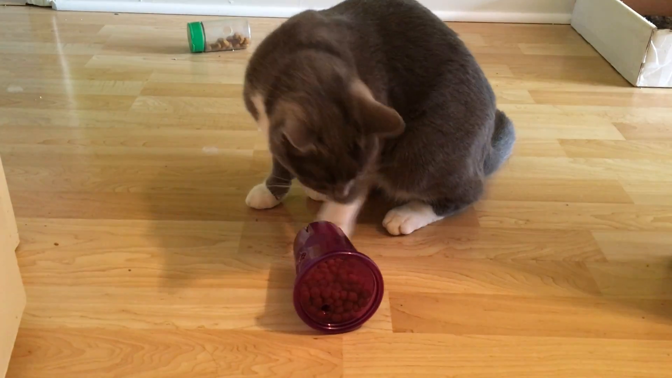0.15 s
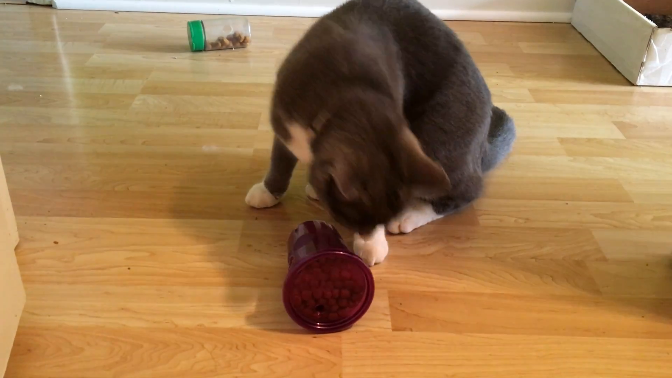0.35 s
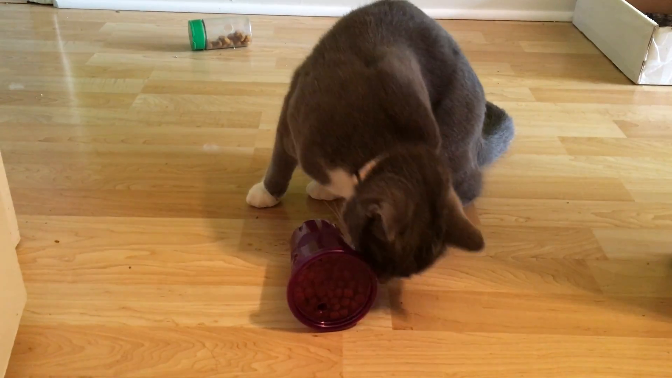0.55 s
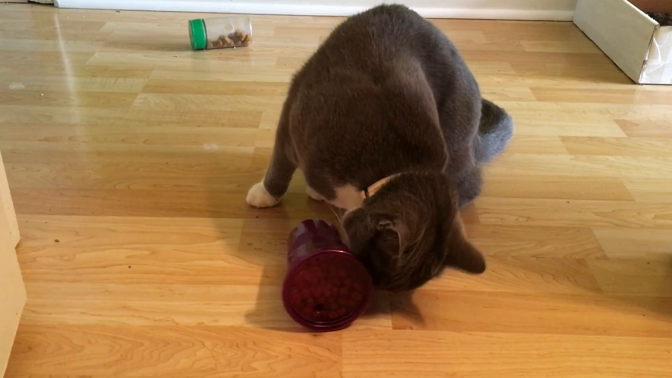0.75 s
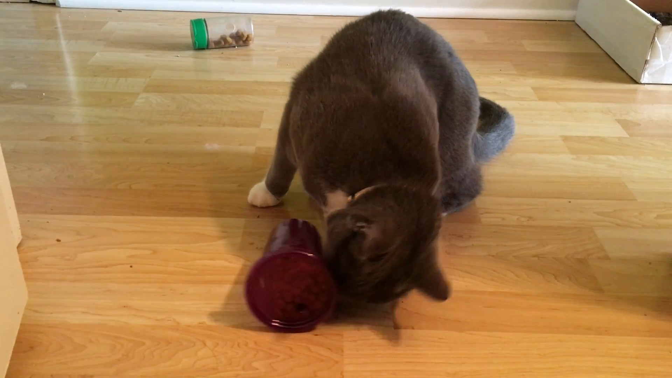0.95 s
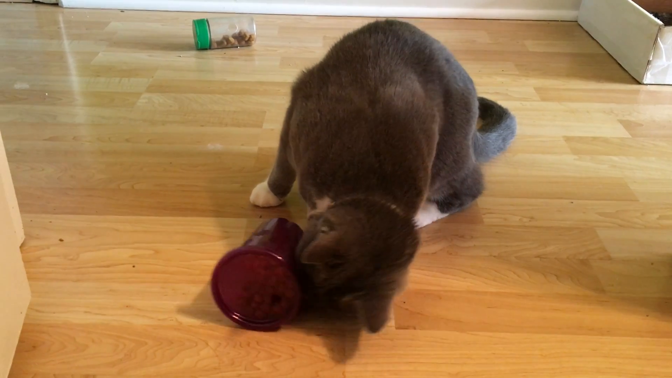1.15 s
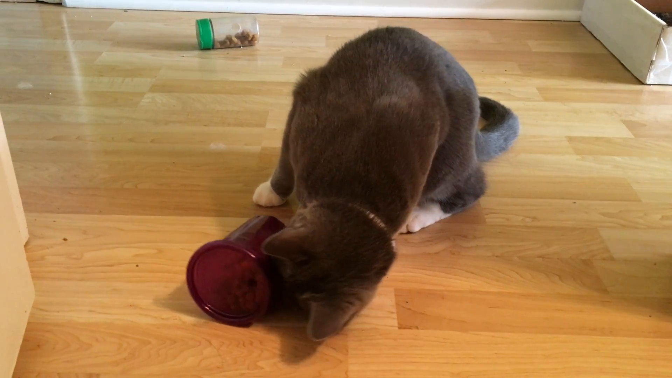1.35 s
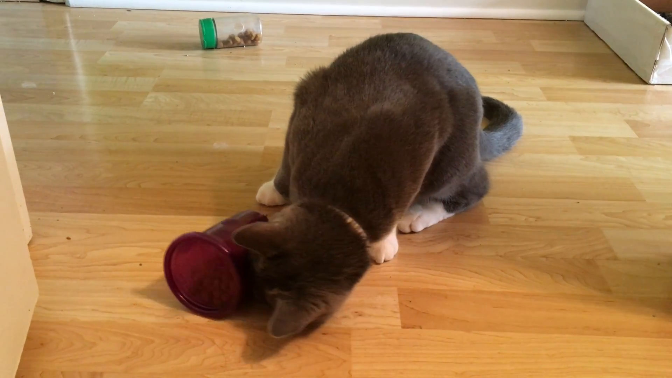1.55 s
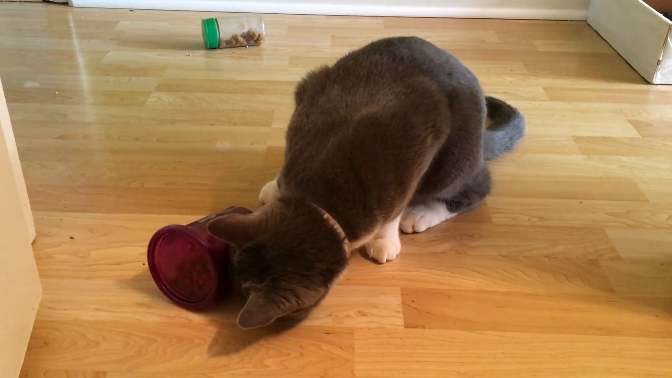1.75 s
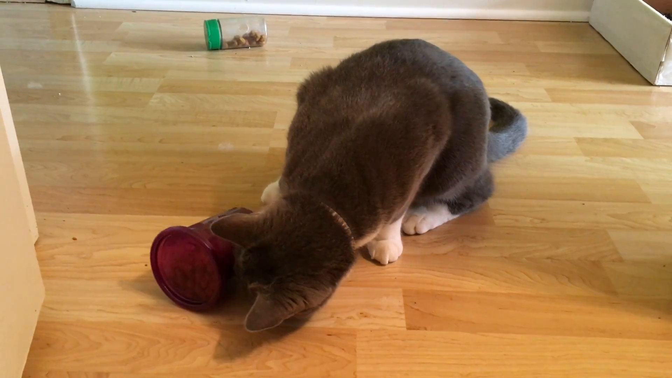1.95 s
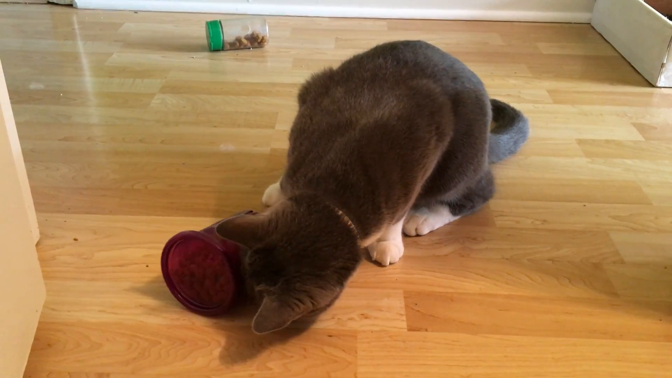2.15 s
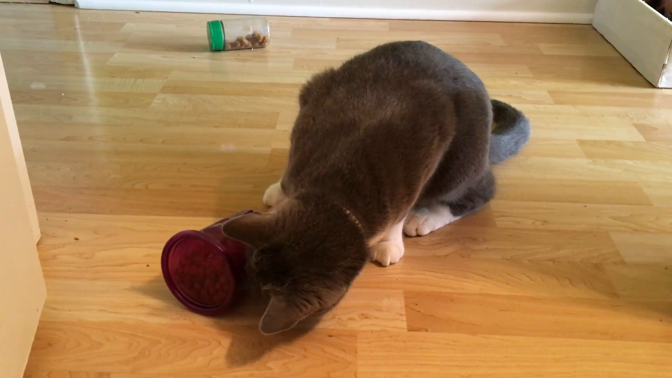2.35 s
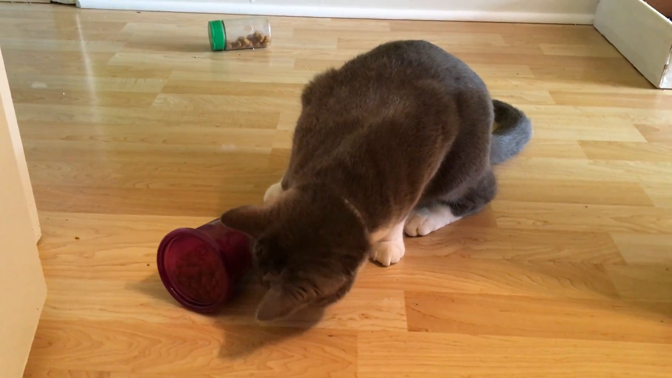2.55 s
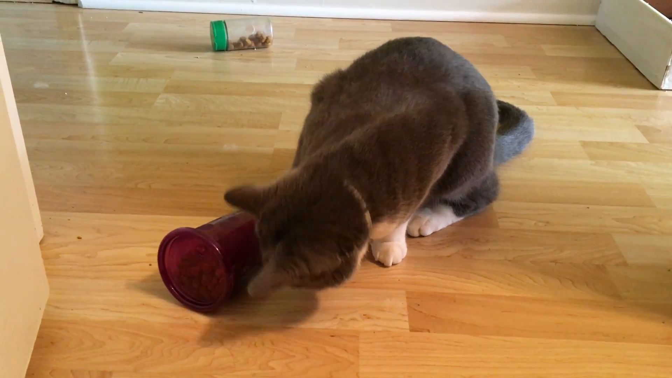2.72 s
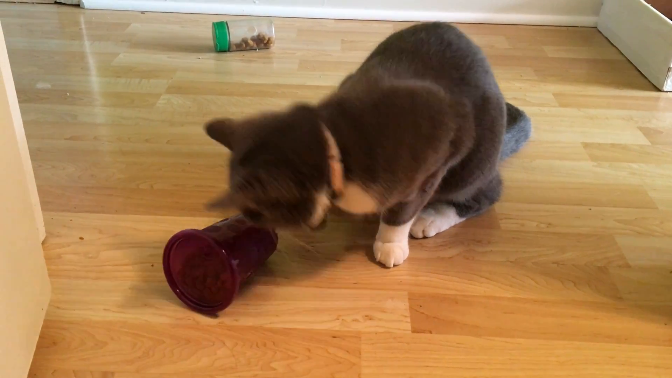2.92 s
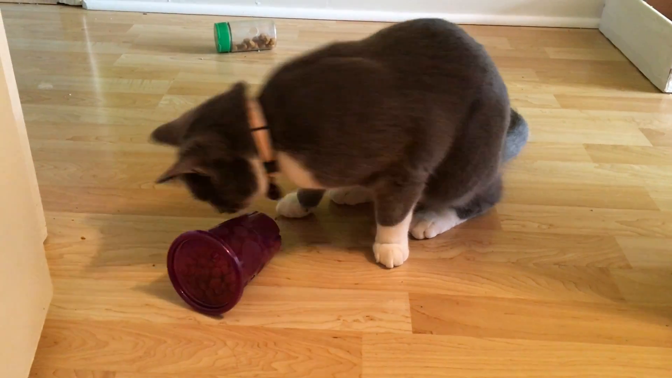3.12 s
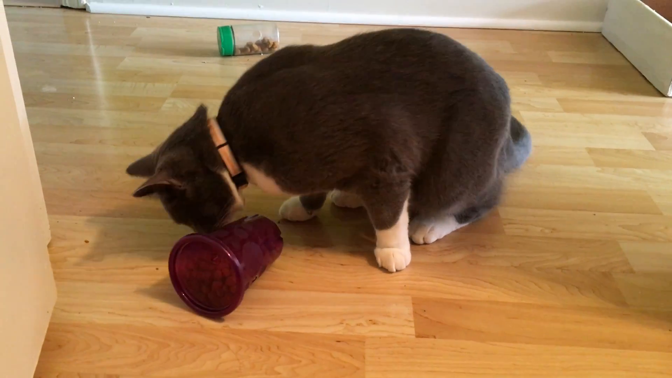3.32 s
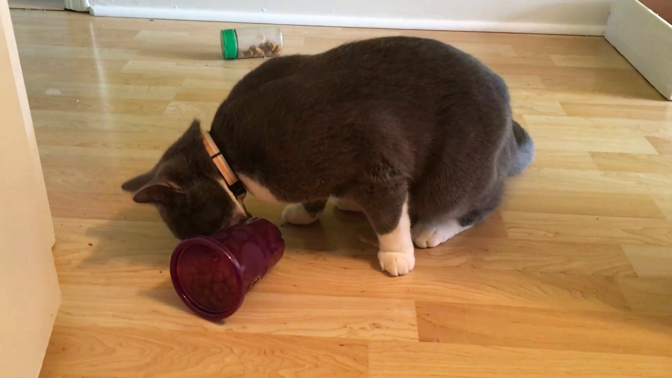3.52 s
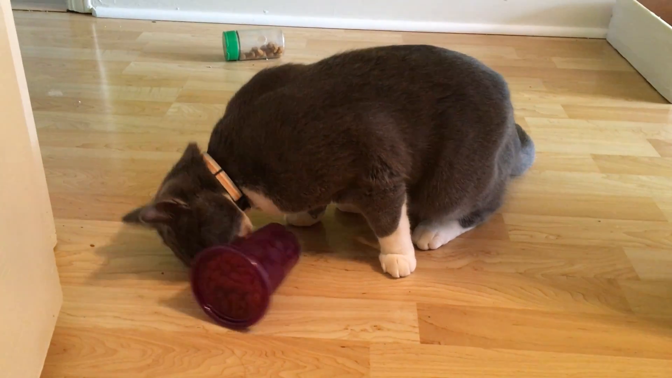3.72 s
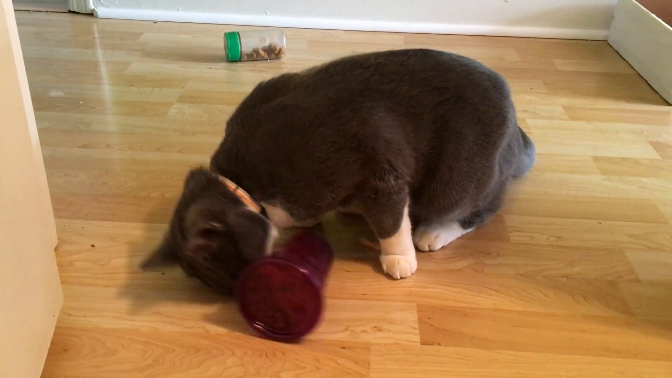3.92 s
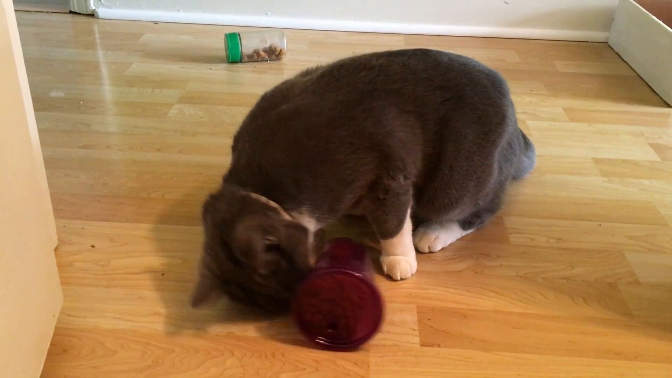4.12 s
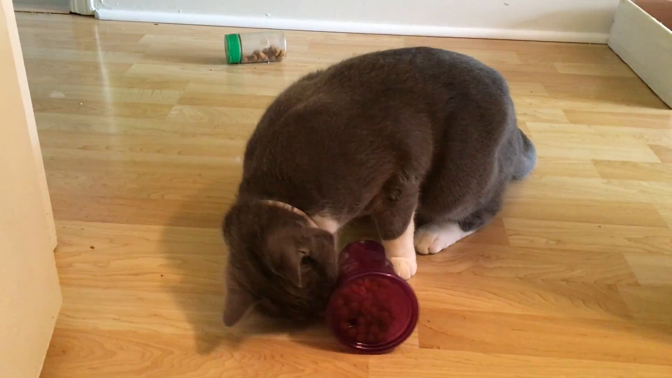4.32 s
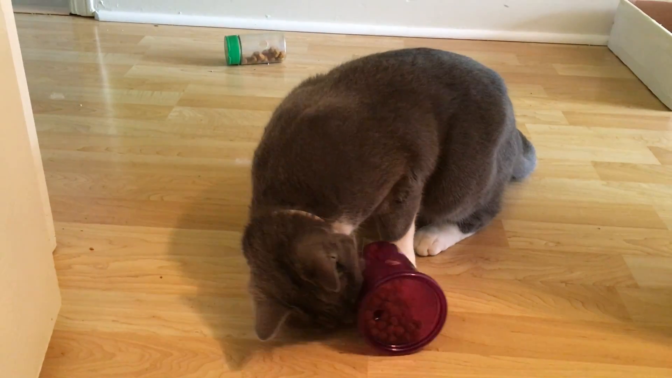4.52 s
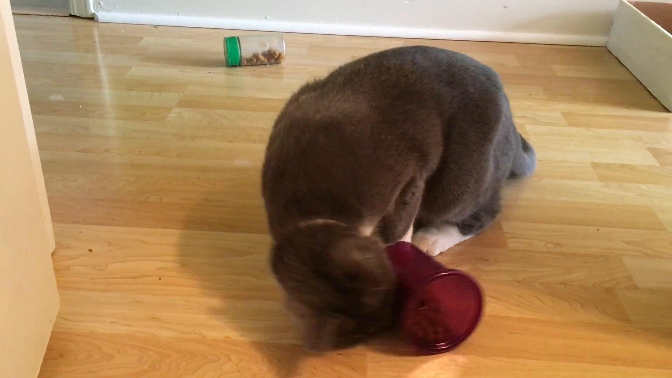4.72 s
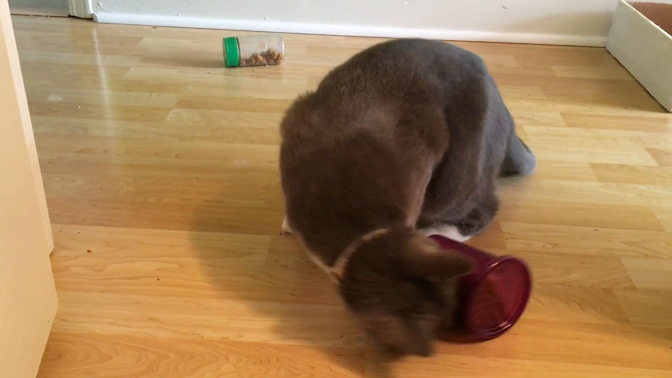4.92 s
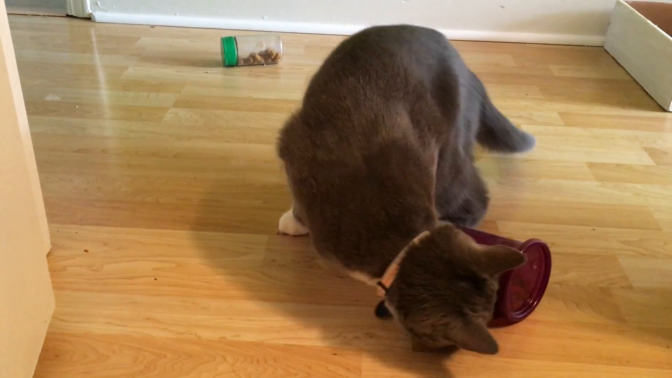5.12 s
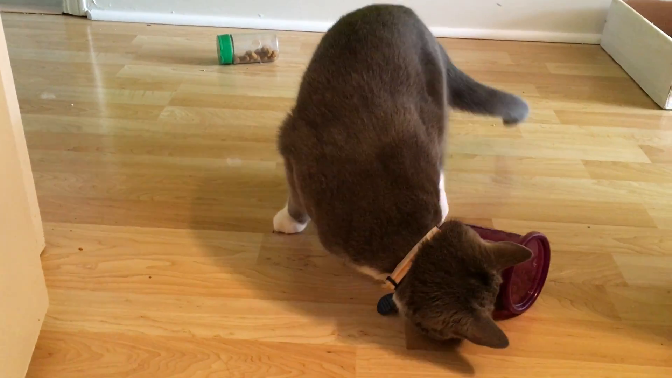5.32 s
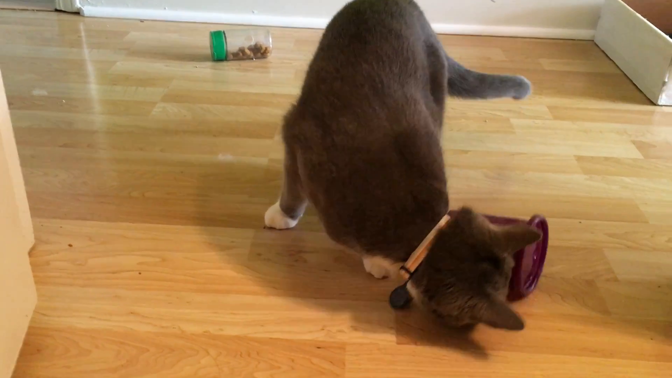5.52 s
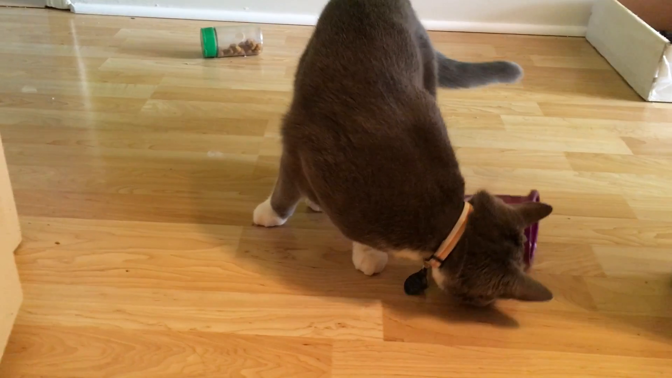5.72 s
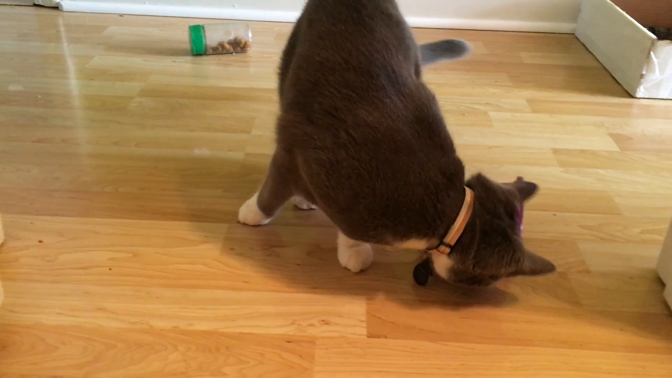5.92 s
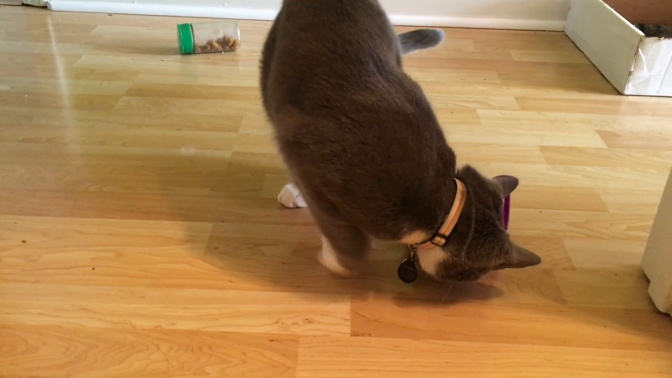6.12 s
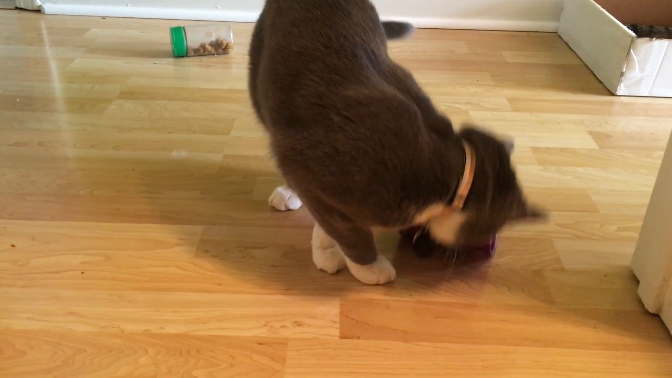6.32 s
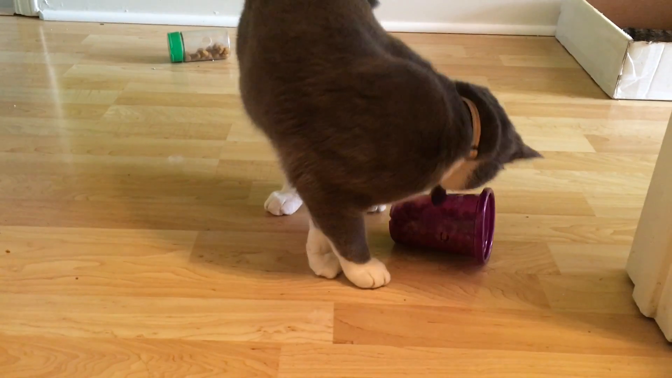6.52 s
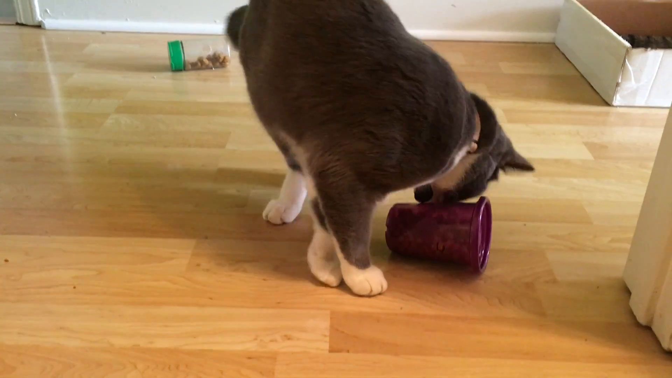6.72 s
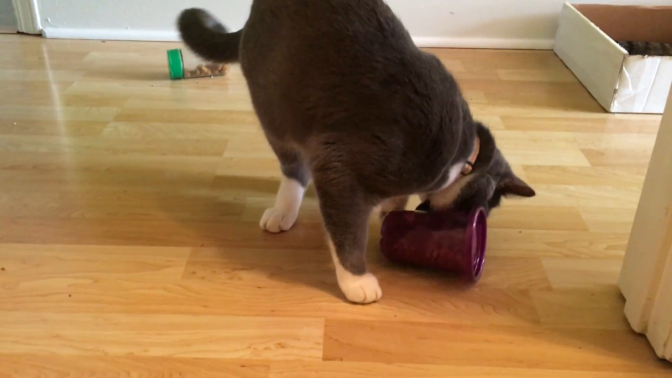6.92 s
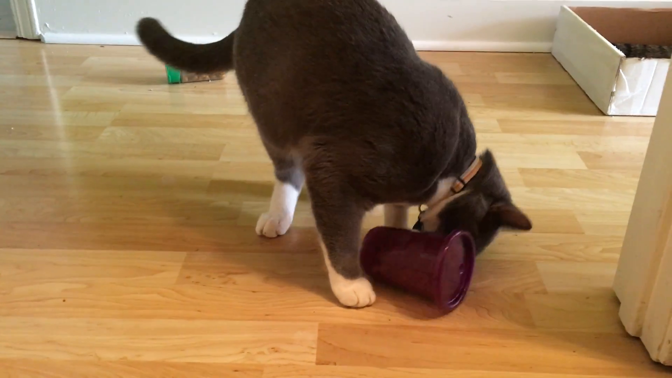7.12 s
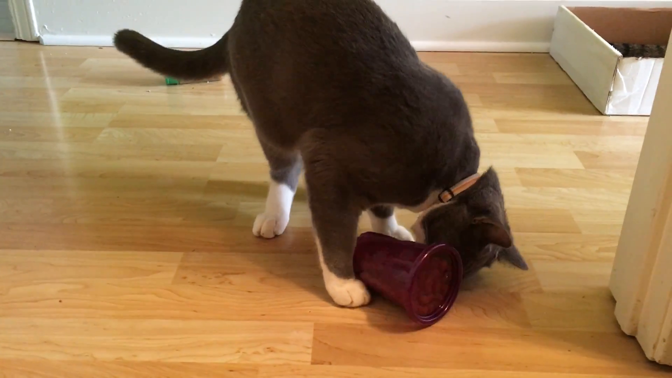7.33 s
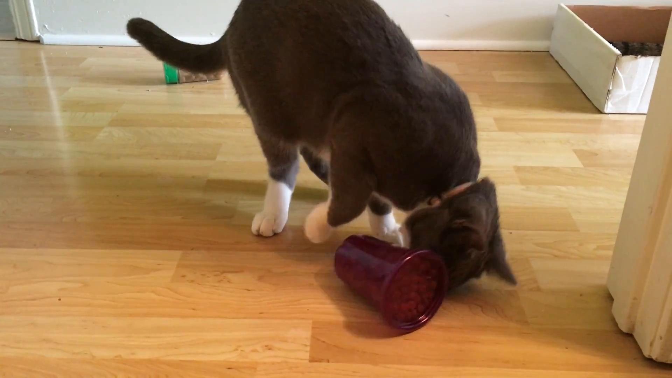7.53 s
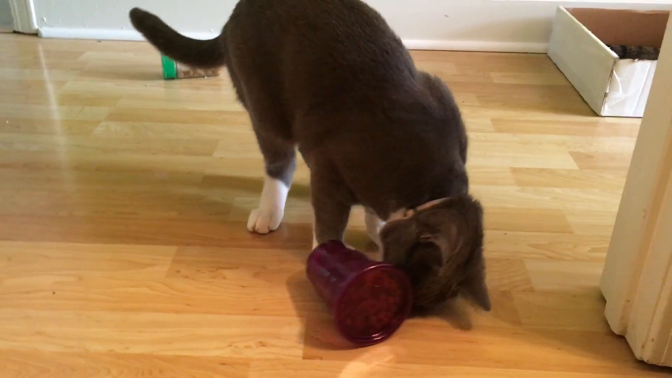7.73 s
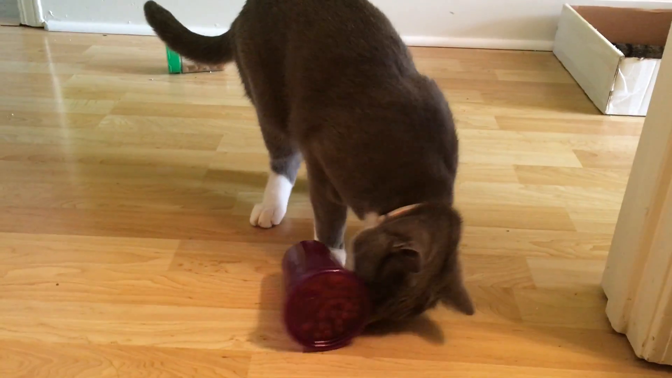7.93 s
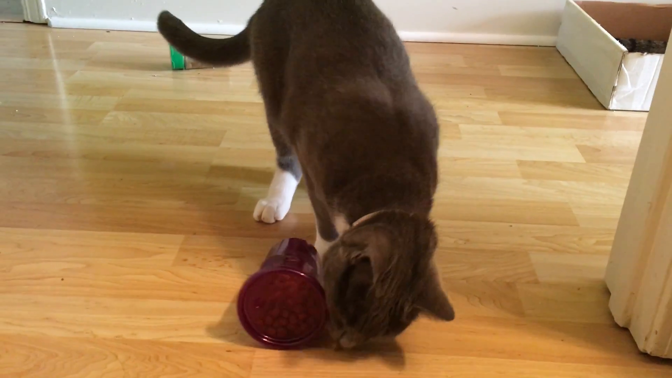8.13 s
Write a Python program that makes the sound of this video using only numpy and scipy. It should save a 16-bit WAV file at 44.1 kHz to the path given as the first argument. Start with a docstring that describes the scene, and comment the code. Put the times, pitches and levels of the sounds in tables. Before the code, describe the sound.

Dry food clicks and tumbles in a plastic cup as a cat nudges it over floorboards, its collar tag tinkling briefly.

```python
"""A small hard room with a wood floor, one microphone close to a cat and a plastic cup of dry food.
At first only faint nosing, over a humming refrigerator and the hiss of the microphone. After a second
the cat shoves the cup: food tumbles and clicks inside, the rim bumps the boards. A lull, then from
4 s a longer push, ending at 6 s with a clear tinkle of the metal collar tag. A paw is set down,
and from 7 s two more bursts of shoving set the food rattling again."""
import sys
import numpy as np
from scipy import signal
from scipy.fft import rfft, irfft
from scipy.io import wavfile

SR = 44100
rng = np.random.default_rng(int(sys.argv[2]) if len(sys.argv) > 2 else 0)


def to_wav(sig):
    """Store sig (one row per channel, or 1-D mono) as 16-bit WAV at the path in sys.argv[1].

    Samples outside -1..1 are clipped; the rate is SR.
    """
    pcm = np.clip(np.atleast_2d(sig), -1, 1) * 32767
    pcm = np.round(pcm).astype(np.int16)
    wavfile.write(sys.argv[1], SR, pcm.T)  # frames by channels


N = 359856

# single pieces of food striking the cup wall:
# (time [s], level [dB], ring centre [Hz], tick against level [dB], ring spread [octaves])
FOOD_HITS = [(1.1152,-22.5,3168,-27,0.38),(1.1268,-31,3060,-34,0.77),(1.144,-27,2940,-37.5,0.37),(1.16,-36,2980,-32,0.56),(1.175,-30.5,2500,-35.5,0.36),(1.1937,-11.5,2690,-28,0.66),(1.2162,-18.5,3780,-28.5,0.87),(1.218,-17.5,4000,-26,0.71),(1.2414,-15,2480,-20,0.93),(1.2642,-24,2690,-21,0.69),(1.313,-17,2792,-27,0.72),(1.3248,-19,3140,-22,0.62),(1.3988,-32,1196,-29.5,1.6),(1.4355,-19,1500,-26,1.15),(1.455,-22,3290,-29,0.44),(1.464,-25,1220,-20,1),(1.479,-30.5,1700,-14,1.4),(1.5117,-31.5,1008,-26,0.57),(1.534,-22,1730,-20,1.2),(1.541,-22.5,1570,-28,1.4),(1.5623,-21.5,1290,-34,0.27),(1.606,-20,2340,-29,0.69),(1.632,-16.5,2400,-24,1.5),(1.6383,-28,1700,-18,0.64),(1.6707,-29,3420,-38,0.6),(1.6776,-32,1700,-29,0.91),(1.6884,-23,3260,-35,0.57),(1.7255,-17.5,2140,-35,1.9),(1.7754,-28,1294,-39,0.77),(1.781,-29,1600,-36.5,1),(1.7968,-17.5,1600,-37.5,0.82),(1.8348,-19.5,1370,-33,1.1),(1.8472,-25,2160,-31,1),(1.857,-24,3220,-35,0.89),(1.8934,-23.5,902,-35.5,0.6),(1.8997,-23,2000,-36,0.95),(1.921,-44.5,1530,-34,0.59),(1.9645,-24.5,1743,-20,1.35),
             (3.863,-27.5,3700,-31,0.47),(3.8815,-26.5,1704,-31,0.9),(3.917,-25,1398,-41.5,0.45),(3.933,-19.5,3350,-24,0.75),(3.9478,-25,3080,-33,1.1),(3.9847,-31,3300,-32,0.72),(4.0068,-20.5,2860,-38,0.77),(4.02,-18.5,3100,-37,0.47),(4.0395,-26.5,3493,-31.5,0.63),(4.044,-16,3497,-35,1),(4.052,-17,4800,-20,0.7),(4.069,-14,3640,-21,0.64),(4.0833,-18,3300,-25.5,0.55),(4.0985,-15,2150,-23,1),(4.107,-18,2310,-27,1),(4.1338,-17,3290,-23.5,0.72),(4.143,-13,3250,-31.5,0.68),(4.1716,-21,3900,-22,.6),(4.1822,-13.5,3352,-22,0.56),(4.1865,-15,3300,-28,0.79),(4.1929,-14,2330,-23,1.1),(4.2158,-16,3290,-27,0.86),(4.2243,-21,2680,-17,1.1),(4.241,-25.5,3401,-19,.6),(4.2805,-17,3400,-20,0.83),(4.3062,-22,4106,-30,.6),(4.3263,-20.5,3260,-28,0.49),(4.3589,-24.5,2300,-26,0.49),(4.38,-27,3330,-33,0.43),(4.43,-25,3440,-28,0.66),(4.4723,-24,3245,-27,0.42),(4.4826,-24.5,2420,-37,0.41),(4.495,-32,2020,-26,0.69),(4.5061,-23.5,2370,-23,1.1),
             (4.6315,-18,3640,-24.5,1.01),(4.672,-21,4070,-29,0.44),(4.7005,-20.5,3620,-25,0.92),(4.705,-18,2750,-28,0.87),(4.7112,-22.5,3000,-31.5,0.76),(4.7138,-18,3116,-27,0.86),(4.7423,-18,2422,-25,1.1),(4.797,-34,2202,-32.5,0.86),(4.8025,-27,2060,-33,0.65),(4.8276,-33,2570,-26,0.53),(4.849,-22,3262,-35.5,0.84),(4.865,-23,2030,-34,0.25),(4.8964,-23,3259,-29,0.63),(4.9096,-15.5,2620,-22,0.77),(4.929,-14.5,2300,-31,1.1),(4.9496,-21,1966,-25,1.08),(4.957,-23,2071,-28,.6),(4.9622,-19,1970,-29.5,0.97),(4.969,-14.5,2000,-23,1),(5.0032,-15,2280,-24,1.1),(5.0335,-19.5,2004,-21,0.97),(5.0489,-19,1950,-36,0.37),(5.0726,-21,1821,-19,0.55),(5.0805,-17.5,3900,-28.5,0.88),(5.116,-19.5,1593,-21,1.1),(5.1248,-16.5,1711,-21.5,1.1),(5.145,-20,1440,-20,0.5),(5.1758,-20,3400,-11.5,0.67),(5.228,-22.5,2214,-23,0.65),(5.276,-25,1510,-36,0.45),(5.3016,-27.5,1680,-33,0.88),(5.34,-28,2273,-26,1.6),(5.357,-30.5,1640,-35,0.97),(5.3708,-25.5,1450,-33,0.41),(5.399,-28,1420,-31,0.3534),(5.4341,-29.5,3550,-18.5,0.38),(5.474,-39,1820,-32.5,0.28),
             (5.548,-32.5,2173,-25,0.87),(5.5593,-31,2170,-36,.6),(5.6,-37,3125,-17,0.73),(5.6547,-37,1301,-34,0.75),(5.6854,-28,1551,-34,0.26),(5.705,-28,2240,-31,.6),(5.716,-23.5,2090,-34,0.51),(5.7214,-20,1930,-24,0.88),(5.749,-25,1900,-28,0.81),(5.7576,-25,2299,-31,0.54),(5.767,-12,1900,-31,1.1),(5.7815,-20,2400,-28,0.82),(5.795,-17,2000,-26,0.91),(5.807,-21,2200,-30,0.74),(5.819,-23,1920,-30,0.56),(5.8402,-30.5,1897,-33.5,0.46),(5.861,-19.5,1900,-30,0.6),(5.895,-29,1628,-26.5,0.66),(5.9384,-24.5,1619,-37,0.73),(5.9524,-22,1798,-36,.6),(5.988,-26,1600,-38,0.8),(6.0046,-34,1700,-35.5,0.37),(6.0352,-42.5,1170,-35.5,0.53),(6.0709,-31.5,3600,-9,.9),(6.1455,-27,1905,-23,0.81),(6.15,-31.5,2565,-21,0.86),
             (6.7175,-32.5,1110,-27.5,0.45),(6.7332,-34.5,5010,-13,0.61),(6.7343,-40,1390,-30,0.34),(6.7944,-30.5,2600,-20,1.06),(6.895,-47,1348,-40,0.29),(6.91,-46,1923,-3,1.23),(6.9272,-28,1570,-32,0.21),(6.953,-42.5,1680,-25,0.3),
             (7.14,-37.5,1600,-30,1.1),(7.1515,-31.5,3500,-31,0.46),(7.1612,-29,2248,-29,0.66),(7.2042,-38,2047,-17,0.92),(7.2245,-25,2090,-30,0.79),(7.2366,-22,1430,-23,1.34),(7.2564,-17.5,2440,-35,0.95),(7.2703,-19,1420,-25,1.137),(7.2795,-24,2020,-32,0.67),(7.306,-11,1410,-23,1.86),(7.3105,-13.5,1900,-22,1.2),(7.3448,-23,2003,-30,0.55),(7.3578,-20,2460,-25,0.93),(7.3691,-11.5,1670,-25,1.5),(7.3733,-24,2000,-29,1),(7.3902,-29,1798,-26,0.71),(7.408,-22.5,1138,-25,1.2),(7.4475,-38.5,1206,-31.5,0.743),(7.4945,-32,1708,-39.5,0.32),
             (7.6933,-34,2500,-30,0.53),(7.7053,-18,2370,-29,1.39),(7.732,-35,2659,-27.5,0.75),(7.765,-18,2660,-41.5,0.68),(7.7985,-28,2590,-33,.8),(7.8116,-16,2389,-39,1.2),(7.8241,-11.5,2280,-32,1.37),(7.834,-17,3000,-31,.9),(7.8514,-13.5,3400,-23,0.72),(7.889,-18,2478,-25,1.3),(7.9156,-23.5,1723,-27,1),(7.972,-16,2528,-28,0.9),(7.9771,-21,2812,-32,0.88),(7.986,-21,2394,-31,0.84),(8.004,-21,1721,-29.5,1.6),(8.0076,-16.5,3000,-25,1.2),(8.0167,-29,3000,-30,.7),(8.0282,-22,3014,-28,0.66),(8.0435,-22,1770,-35.5,1.1),(8.0603,-17.5,3280,-27,.8),(8.0662,-15,3060,-33,0.87),(8.0823,-17.5,3311,-26,1.09),(8.091,-17.5,3352,-14.5,1.7),(8.1008,-13.5,2720,-23,1.2),(8.108,-20,2400,-28.5,0.94),(8.1338,-22,3674,-19,0.51)]
# shoves of the nose: (top reached [s], swell [s], hold [s], decay [s], force [dB],
# boards against force [dB], rattle centre [Hz], brightness [dB/octave])
SHOVES = [(0.05, 0.076, 0.083, 0.17, -72, 0.5, 2530, -1.5), (1.12, 0.094, .05, .05, -59.5, 15, 2690, -5),
          (1.188, 0.11, 0.15, 0.16, -42.5, -15, 2530, -2), (1.439, 0.042, 0.11, 0.11, -42, -8.5, 1870, -2),
          (1.66, 0.27, 0.046, 0.31, -43.5, -12, 2430, -1),
          (1.809, 0.18, 0.0091, 0.35, -41.5, -3.5, 1980, 0.5), (3.919, 0.11, 0.119, .1, -49, 2.5, 2350, -4),
          (4.07, 0.19, 0.18, 0.44, -38.5, -2.5, 2720, -1.5),
          (4.708, 0.21, 0.042, 0.26, -45.5, -0.5, 2600, -4), (5.0, 0.67, 0.19, 0.24, -40, -3, 1990, -0.5),
          (5.36, 0.0991, 0.024, 0.68, -57, -6.5, 1800, -1), (5.69, 0.21, 0.031, 0.11, -48.5, 2.5, 1710, -3),
          (5.765, 0.075, 0.013, 0.4, -35.5, -10, 1810, 0.5),
          (5.928, 0.11, 0.011, 0.41, -48.5, 1.5, 1668, -1.5), (6.75, 0.284, .05, .4, -66.5, -22, 2210, 2),
          (7.17, 0.0602, 0.13, 0.0984, -54.5, 5, 1930, -4),
          (7.314, 0.048, 0.024, 0.34, -40, -3.5, 1840, -0.5),
          (7.73, 0.056, 0.08, 0.05286, -54, 5, 2002, -2.5),
          (7.814, 0.047, 0.034, 0.25, -34, -8, 2420, -1.5), (8.001, 0.035, 0.024, 0.168, -41, -8, 2423, -2),
          (8.1, 0.2, 0.0157, 0.38, -36.5, -5, 2823, -3.5)]
# rim knocking the boards: (time [s], level [dB], ring centre [Hz])
RIM_KNOCKS = [(1.188, -23, 390), (1.224, -30, 482), (1.261, -28.5, 624), (1.29, -32, 525.9),
              (1.398, -28, 507), (1.514, -28, 533), (1.563, -28.5, 358), (1.6, -26, 530),
              (1.619, -33.5, 450), (1.744, -32, 422), (1.842, -29.5, 530), (1.893, -24, 496),
              (3.915, -36, 479), (3.995, -37, 516.5), (4.013, -25.5, 340), (4.169, -36, 450),
              (4.218, -30, 487.8), (4.229, -28, 418), (4.251, -25, 405), (4.308, -26, 540),
              (4.358, -29, 505), (4.378, -29, 373), (4.423, -27.5, 400.6), (4.4326, -24.5, 617),
              (4.484, -33, 546), (4.516, -34, 426), (4.688, -37.5, 380.1), (4.83, -33, 544),
              (4.89, -34, 365), (4.923, -32, 560), (4.967, -31, 363), (4.981, -32, 450), (5.014, -25, 358),
              (5.053, -49, 460), (5.076, -38, 435), (5.121, -29, 415), (5.225, -39, 559.6),
              (5.27, -32, 384), (5.309, -31.5, 390), (5.3731, -28, 394), (5.751, -36, 396),
              (5.853, -29, 390.9), (5.906, -30, 420), (5.948, -30.5, 385.8), (7.171, -35, 463.3),
              (7.407, -38, 878), (7.816, -33, 445.7), (7.863, -31.5, 450), (7.898, -36, 358),
              (7.945, -30.5, 374), (7.993, -31, 440), (8.104, -32, 500)]
# touches of the collar tag: (time [s], level [dB])
TAG_TOUCHES = [(0.9991, -67), (3.8728, -52.5), (4.3295, -55), (4.36, -56), (4.5493, -66), (4.591, -57),
               (5.123, -53), (5.1754, -59), (5.1988, -51.5), (5.515, -70), (5.582, -47), (5.6355, -56),
               (5.657, -53), (5.682, -58), (5.7016, -54), (5.721, -58), (5.7423, -51), (5.8994, -56),
               (5.929, -62), (6.0596, -41), (6.0623, -30), (6.7705, -66.5), (6.857, -69), (6.8663, -65),
               (6.918, -68), (6.93, -59.5)]
# faint ticks in the pauses, the cat's nosing and short, high pings of the collar tag:
# (time [s], level [dB], pitch [Hz])
FAINT_TICKS = [(.003, -50, 3050), (.022, -53, 3040), (.205, -58, 2200), (0.209, -58, 1240),
               (.38, -64, 6300), (.503, -64, 4300), (.508, -64, 3200), (.585, -64, 3500), (.662, -59, 1920),
               (.68, -49.5, 1950), (.697, -59.5, 1896), (.793, -59, 6000), (.925, -61, 2200),
               (1.082, -49, 3212), (2.115, -52, 13800), (2.218, -54, 12200), (2.332, -61, 12400),
               (2.4194, -49, 12600), (2.456, -59, 1676), (2.81, -60, 12000), (2.92, -60, 3190),
               (2.94, -59, 6800), (3.106, -59, 12300), (3.114, -51, 3800), (3.118, -53, 1950),
               (3.309, -53, 12600), (3.523, -51, 4170)]
# a paw set down: (time [s], level [dB], pitch [Hz], t60 [s])
PAW_STEP = (6.706, -32, 100, .06)

RING_CYCLES = 12  # plastic damps every mode of the cup wall by 60 dB in this many cycles
# cup wall: (frequency [Hz], level [dB], t60 [s])
CUP_MODES = [(hz, db, RING_CYCLES / hz) for hz, db in [ (1050, -7), (1350, -1.0), (1700, -1.0),
             (1980, -8.5), (2300, 3.0), (2750, -5.5), (3290, 3.0), (3750, 2.5), (4300, 3.5), (5000, -6.0),
             (5570, 8.5), (6400, 9.5), (7200, -22.0)]]
# flat lid of the cup: (frequency [Hz], level [dB], t60 [s])
LID_MODES = [(1700, -14, 0.021), (1980, -15.5, 0.023), (3287, -11, 0.015)]
# tick of a hard piece of food: (frequency [Hz], level [dB], t60 [s])
TICK_MODES = [(8600, 9, 0.0015), (9250, 5.5, 0.00071), (12000, -1, 0.0026), (15050, -4, 0.0016)]
# boards and the air in the cup: (frequency [Hz], level [dB], t60 [s])
BOARD_MODES = [(256, -8, 0.051), (310, -8, 0.036), (363, -2.5, 0.042), (440, 2.5, 0.015), (521, -1, 0.033),
               (585, -5.5, 0.017), (785, -23, 0.011), (963, 7, 0.032), (1280, -17, 0.0071)]
# metal tag: (frequency [Hz], level [dB], t60 [s])
TAG_MODES = [(8950, -10, .018), (12150, 7, .011), (12300, -18, .08), (12480, 14, .011), (12800, 3, .01),
             (14370, -11, .009), (15400, -10, .008)]

# decay of the room: (frequency [Hz], t60 [s])
ROOM_DECAY = [(300, 0.45), (1000, 0.34), (3000, 0.29), (8000, 0.16), (14000, 0.14)]
# refrigerator: (frequency [Hz], level [dB], side tones against level [dB])
HUM_TONES = [(120.2, -55.5, -12), (241.9, -60.5, -10.5), (358, -70, -17), (463, -80, -7)]
# house rumble and microphone hiss: (frequency [Hz], relative level [dB])
NOISE_SPECTRUM = [(20, -16), (40, -19.5), (62, -5), (75, 1.5), (92, -10.5), (112, -1), (135, -15.5),
                  (175, -25), (245, -10), (330, -24), (600, -32.5), (1950, -36), (2800, -42.5), (4000, -44),
                  (10500, -52), (16000, -54.5)]


def food_clicks():
    """Hard pieces set all the wall's modes going almost at once; near a tone of the lid, it rings on."""
    s, db, hz, tick_db, octaves = np.transpose(FOOD_HITS)
    strength = amp(db)[:, None]
    wall = strength * strike_spot(CUP_MODES, hz, octaves[:, None], scatter_db=1.16)
    tick = amp((db + tick_db)[:, None] + 0.77 * rng.standard_normal((len(s), len(TICK_MODES))))
    off_lid_tone = np.log2(np.array(LID_MODES)[:, 0] / hz[:, None]) / 0.18
    lid = ring(LID_MODES, s, strength * np.exp(-off_lid_tone ** 2 / 2), detune=.012, tunings=3)
    share = np.hstack([wall, tick])
    return lid + ring(CUP_MODES + TICK_MODES, s, share, detune=0.038, tunings=3, late_cycles=.7)


def food_rattle():
    """Many small pieces tumble against the cup wall; a few land harder."""
    modes = CUP_MODES + TICK_MODES
    s = tumble_times(per_s=1100)
    db, _, hz, brightness = shove(s)
    strength = amp(db + 4 + 2.94 * np.minimum(rng.exponential(1, len(s)), 3.2))[:, None]
    tilt = amp(brightness[:, None] * np.log2(np.array(modes)[:, 0] / 2500))
    centre_hz = hz * 2 ** (0.55 * rng.standard_normal(len(s)))
    wall = strike_spot(CUP_MODES, centre_hz, octaves=1.14, scatter_db=4.5)
    tick = amp(-25 + 1.84 * rng.standard_normal((len(s), len(TICK_MODES))))
    return ring(modes, s, strength * tilt * np.hstack([wall, tick]), detune=0.082, tunings=4)


def rim_bumps():
    """The rim knocks on the boards and chatters while the cup travels."""
    knock_s, db, hz = np.transpose(RIM_KNOCKS)
    knocks = amp(db)[:, None] * strike_spot(BOARD_MODES, hz, octaves=0.45, scatter_db=6)
    chatter_s = tumble_times(per_s=200)
    _, boards_db, _, _ = shove(chatter_s)
    strength = amp(boards_db + 2.5 + 2.22 * np.minimum(rng.exponential(1, len(chatter_s)), 4))[:, None]
    spots = strike_spot(BOARD_MODES, np.full(len(chatter_s), 430.), octaves=0.43, scatter_db=7.5)
    return ring(BOARD_MODES, np.append(knock_s, chatter_s), np.vstack([knocks, strength * spots]),
                detune=0.052, tunings=4, late_cycles=0.22, build_cycles=0.33)


def shove(s, taper=2.2):
    """Shoves swell, hold and die; the strongest sets force, boards level, rattle centre and brightness."""
    top, swell, hold, decay, db, boards_db, hz, brightness = np.transpose(SHOVES)[:, :, None]
    motion = 1 - np.maximum(top - s, 0) / swell - np.maximum(s - top - hold, 0) / decay
    under_top_db = -20 * taper * np.log10(np.clip(motion, 1e-4, 1))
    force_db = db - under_top_db
    brightness = brightness - 0.17 * under_top_db  # gentler tumbling is duller
    strongest = np.argmax(force_db, axis=0)
    lead = strongest, np.arange(len(s))
    return force_db[lead], (force_db + boards_db)[lead], hz[strongest, 0], brightness[lead]


def tumble_times(per_s):
    """Random moments while the cup is moving."""
    s = np.flatnonzero(rng.random(N) < per_s / SR) / SR
    force_db = shove(s)[0]
    return s[force_db > -90]


def strike_spot(modes, centre_hz, octaves, scatter_db):
    """Where a blow lands decides which modes answer, and with which sign."""
    hz, db, _ = np.transpose(modes)
    away = np.log2(hz / centre_hz[:, None]) / octaves
    scatter, polarity = rng.standard_normal(away.shape + (2,)).transpose(2, 0, 1)
    share = np.exp(-away ** 2 / 2) * amp(scatter_db * scatter) * np.sign(polarity)
    return share / np.linalg.norm(share * amp(db), axis=1, keepdims=True)


def ring(modes, s, share, detune=0., tunings=1, late_cycles=1.2, build_cycles=0.74):
    """Blows at times s ring the modes, each as hard as share (blows x modes) says."""
    out = np.zeros(N)
    sides = rng.integers(0, tunings, share.shape)  # the object turns: each blow meets one of its tunings
    lags = rng.random(share.shape)
    for (hz, db, t60), strength, side, lag in zip(modes, share.T, sides.T, lags.T):
        t = np.arange(int(SR * t60) + 64) / SR
        arrival = s + lag * late_cycles / hz  # bending waves in the wall: low modes speak later
        for k, shift in enumerate(np.linspace(-detune, detune, tunings)):
            cycles = hz * (1 + shift) * t
            contact = 1 - np.exp(-(cycles / build_cycles) ** 2)
            tone = amp(db - 60 * t / t60) * contact * np.sin(2 * np.pi * cycles)
            blows = np.bincount((arrival * SR).astype(int), strength * (side == k), N)[:N]
            out += signal.oaconvolve(blows, tone)[:N]
    return out


def collar_tag():
    """The tag swings against its ring with a soft, sliding touch and rebounds four times, weaker."""
    s, db = np.transpose(TAG_TOUCHES)[:, :, None]
    delay_s = np.cumsum(rng.uniform(0, .025, (len(s), 5)), axis=1) * [0, 1, 1, 1, 1]
    rebound_db = np.minimum(db - 11, -64.5) - 150 * delay_s
    db = np.where(delay_s > 0, rebound_db, db)
    share = amp(db.reshape(-1, 1) + 2 * rng.standard_normal((db.size, len(TAG_MODES))))
    return ring(TAG_MODES, (s + delay_s).ravel(), share, detune=.006, tunings=3, build_cycles=30)


def cat_stirring(t60_cycles=30):
    """Nose touches, high tag pings and the paw each ring briefly; fur and whiskers crackle on the cup."""
    touches = np.array([(s, db, hz, t60_cycles / hz) for s, db, hz in FAINT_TICKS] + [PAW_STEP])
    crackle_s = np.flatnonzero(rng.random(N) < 25 / SR) / SR
    strength = amp(-63.5 + 1.5 * np.minimum(rng.exponential(1, len(crackle_s)), 4))[:, None]
    centre_hz = 2200 * 2 ** (0.9 * rng.standard_normal(len(crackle_s)))
    crackle = strength * strike_spot(CUP_MODES, centre_hz, octaves=0.96, scatter_db=-2)
    touch_s, touch_modes = touches[:, 0], touches[:, [2, 1, 3]]
    ticks = ring(touch_modes, touch_s, np.eye(len(touches)), late_cycles=0)
    return ticks + ring(CUP_MODES, crackle_s, crackle)


def room_echoes(x, patterns=24, hop=1024):
    """Reflections of a small hard room, treble dying first, redrawn at random so no pitch stands out."""
    taps = np.zeros((patterns, SR // 2))
    arrivals = np.arange(40, SR // 2 - 20, 20) + rng.integers(0, 20, (patterns, SR // 40 - 2))
    np.put_along_axis(taps, arrivals, rng.choice([-1., 1.], arrivals.shape), 1)
    hz, t, bands = signal.stft(taps, SR, nperseg=128)
    early_lift = 1 + 2 * np.exp(-t / 0.0032)  # floor and cup answer first and loudest
    decay = amp(-60 * t / along_log_hz(ROOM_DECAY, hz)[:, None])
    tails = signal.istft(bands * early_lift * decay, SR, nperseg=128)[1]
    fade = np.sin(np.pi * np.arange(2 * hop) / (2 * hop))
    padded, out = np.pad(x, (hop, 3 * hop)), np.zeros(N + SR + 4 * hop)
    for k, tail in enumerate(tails[rng.integers(0, patterns, N // hop + 2)]):
        echo = signal.fftconvolve(padded[k * hop:][:2 * hop] * fade, tail / np.linalg.norm(tail))
        out[k * hop:][:len(echo)] += echo
    return out[hop:][:N]


def refrigerator(shaft_hz=29.52):
    """Mains tones waver in level; the turning shaft flanks each with two side tones."""
    t, out = np.arange(N) / SR, np.zeros(N)
    for hz, db, side_db in HUM_TONES:
        waver = sum(np.sin(2 * np.pi * (rate * t + rng.random())) for rate in np.geomspace(.3, 4, 8))
        waver_db = 2.4 * waver / np.sqrt(np.mean(waver ** 2))
        shaft = 1 + 2 * amp(side_db) * np.cos(2 * np.pi * (shaft_hz * t + rng.random()))
        out += np.sqrt(2) * amp(db + waver_db) * shaft * np.sin(2 * np.pi * (hz * t + rng.random()))
    return out


def rumble_and_hiss(rumble_db=-56.5):
    """Low rumble of the house and the steady hiss of the microphone."""
    hz = np.fft.rfftfreq(N, 1 / SR)
    spectrum = rfft(rng.standard_normal(N)) * amp(along_log_hz(NOISE_SPECTRUM, hz))
    rumble = irfft(spectrum * (hz < 110), N)
    return amp(rumble_db) * irfft(spectrum, N) / np.std(rumble)


def amp(db):
    """Decibels to gain."""
    return 10 ** (np.asarray(db) / 20)


def along_log_hz(points, hz):
    """Reads a table along log frequency."""
    table_hz, value = np.transpose(points)
    return np.interp(np.log(hz + 1), np.log(table_hz + 1), value)


def scene():
    """Cup and cat are close to the microphone, so their direct sound stands over the room behind."""
    near = food_clicks() + food_rattle() + collar_tag() + cat_stirring()
    boards = rim_bumps()
    direct = amp(1.8) * near + boards
    echoes = room_echoes(amp(-.8) * near + amp(-3.5) * boards)
    return (direct + echoes + refrigerator() + rumble_and_hiss())[None]


def record(dry, ceiling=.2, edge_hz=15900):
    """The microphone's input stage rounds off the sharpest peaks; a low-pass cuts the highest treble."""
    rounded = ceiling * np.tanh(dry / ceiling)
    low_pass = signal.firwin(511, edge_hz, window=("kaiser", 9), fs=SR)
    return signal.oaconvolve(rounded, low_pass[None], "same")


dry = scene()
out = record(dry)
to_wav(out)
```